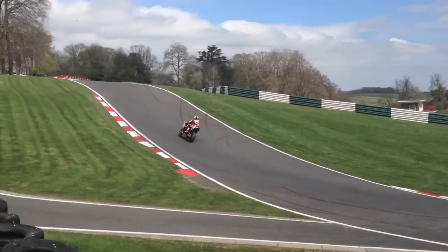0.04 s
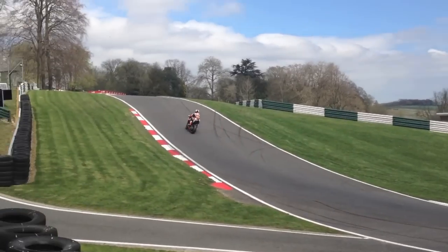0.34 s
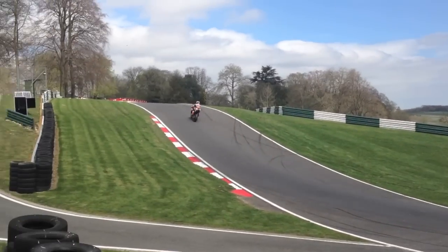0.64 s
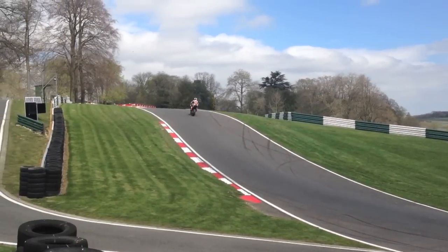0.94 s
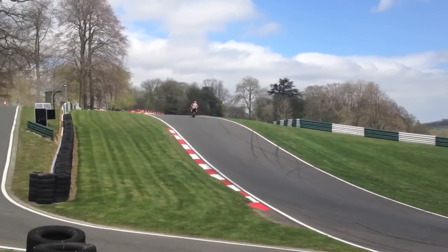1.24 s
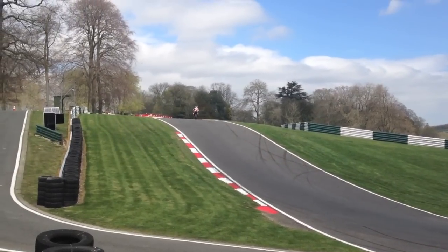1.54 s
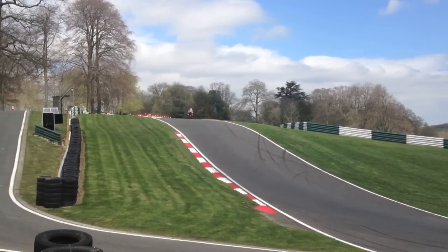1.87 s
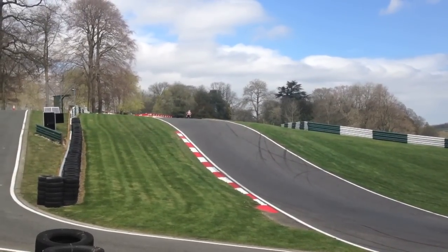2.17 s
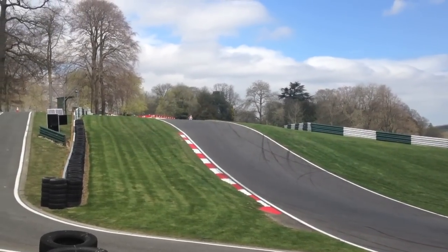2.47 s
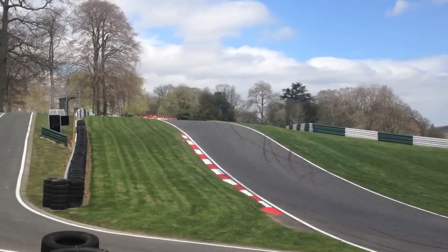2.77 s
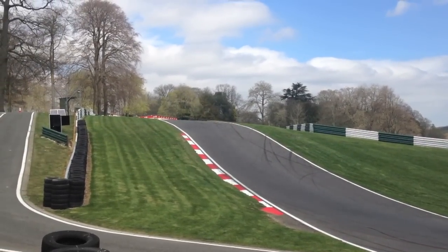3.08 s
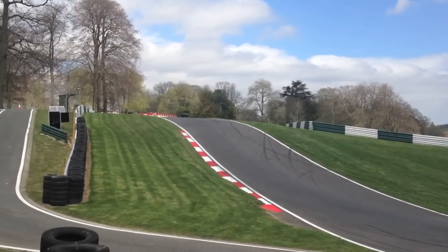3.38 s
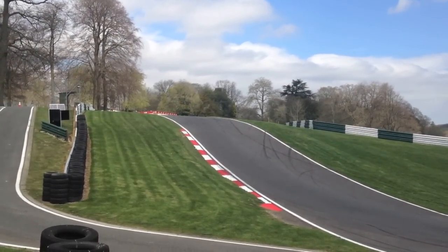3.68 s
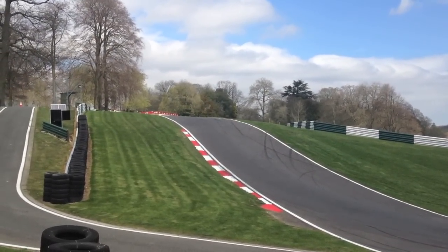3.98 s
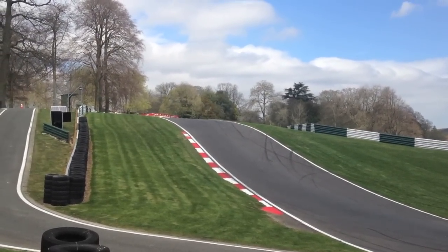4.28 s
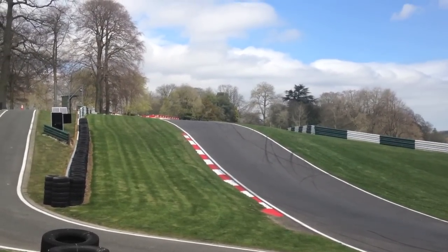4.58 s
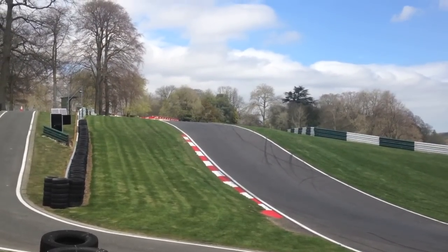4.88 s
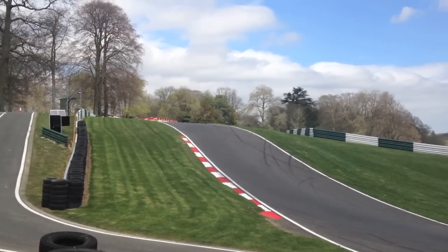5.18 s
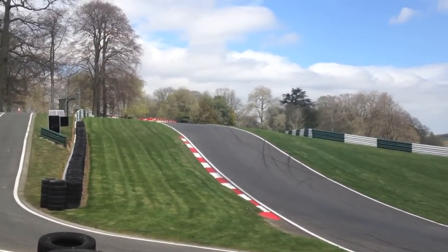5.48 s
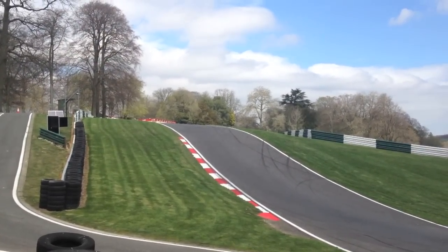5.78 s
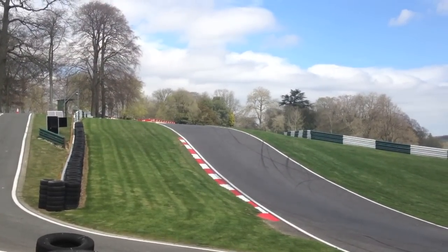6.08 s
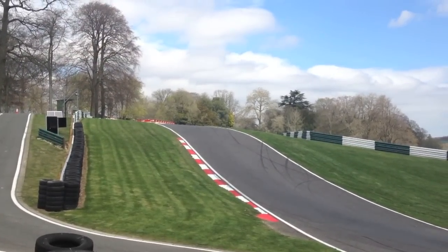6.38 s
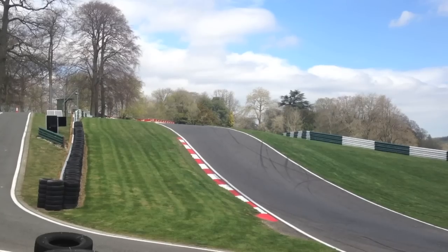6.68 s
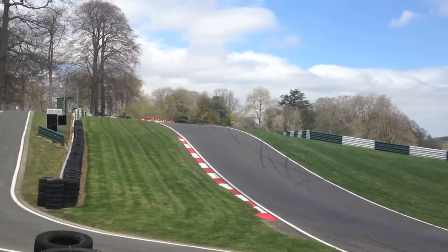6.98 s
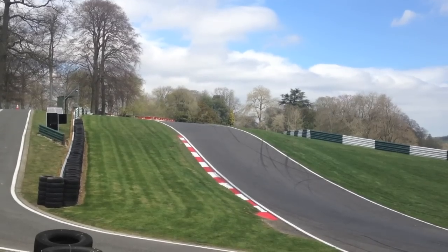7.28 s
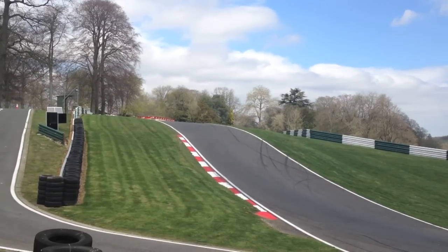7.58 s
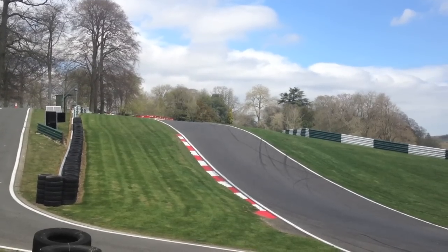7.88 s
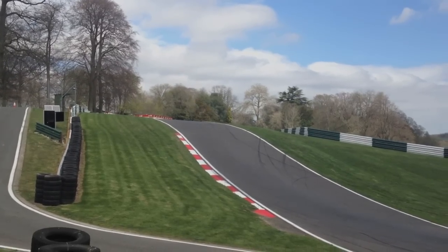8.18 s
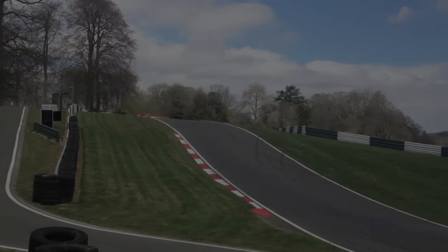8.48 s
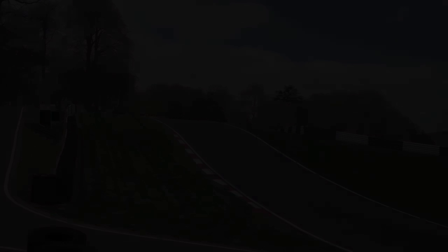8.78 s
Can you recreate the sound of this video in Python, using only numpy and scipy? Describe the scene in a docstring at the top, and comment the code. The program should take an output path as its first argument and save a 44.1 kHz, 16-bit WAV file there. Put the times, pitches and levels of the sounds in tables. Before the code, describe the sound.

Heard from the trackside in open air, a racing motorbike accelerates away with a growling, rasping engine. A brief bright surge of throttle leads into a steadily climbing, more distant roar. Then the throttle closes suddenly and a string of exhaust crackles and bangs follows, echoing lightly over a quieter, falling engine note that dies away behind a hill.

```python
"""Racing motorcycle over a crest

A bike with four unevenly firing cylinders climbs away, with a burst of throttle near the top.
Each firing rings the exhaust pipe. Out of sight it revs on, then the throttle shuts: the note sinks
and unburnt fuel crackles and bangs in the exhaust. Trees and barriers scatter the sound
into a roar that dies away."""
import sys
import numpy as np
from scipy import signal
from scipy.fft import rfft, next_fast_len
from scipy.io import wavfile
from scipy.ndimage import uniform_filter1d

SR = 44100
rng = np.random.default_rng(int(sys.argv[2]) if len(sys.argv) > 2 else 0)


def wav_record(signal):
    """Record a signal, one row per channel, as 16-bit PCM in the file named by sys.argv[1]."""
    frames = np.transpose(np.atleast_2d(signal))
    bounded = np.clip(frames, -1, 1)
    # unit amplitude maps onto the largest positive 16-bit level
    quanta = np.round(bounded * 32767).astype(np.int16)
    wavfile.write(sys.argv[1], SR, quanta)


N = 398652

# echoes from barriers and trees: (delay [s], level [dB])
TREE_ECHOES = [(0.013, -18), (0.025, -18.5), (0.073, -18.5), (.095, -16), (0.22, -17.5)]
# tone colour of the scattered roar and of its hiss: (pitch [Hz], relative level [dB])
ROAR_COLOUR = [(26, -65.5), (45, -59.5), (128, -16), (218, -14), (265, -10.5), (401, -15), (442, -16.5),
               (499, -9.5), (702, -13.5), (1450, -15.5), (1640, -10.5), (2670, -14), (5150, -37)]
HISS_COLOUR = [(3000, 11.5), (4500, 4), (5500, -1.5), (7000, -7), (8500, -24.5), (10000, -44.5),
               (15000, -47)]
# the treble once the throttle is shut: (time [s], relative level [dB])
COAST_TREBLE = [(4.1, -39), (4.64, -38), (5.22, -45.5), (5.64, -44), (5.8, -41), (5.96, -44), (6.45, -46.5),
                (6.91, -44.5), (7.19, -41.5), (7.94, -51), (8.1, -55.5)]
# how much of the rasp comes straight to the listener: (time [s], share of power [0-1])
DIRECT_SHARE = [(0, .87), (1.75, .91), (1.95, .95), (2.25, .9), (2.52, .05)]
# how late the bounce off the track arrives: (time [s], delay [s])
BOUNCE_DELAY = [(0, 0.0015), (.4, 0.0023), (.9, 0.0017), (1.6, 0.00182), (2.3, 0.0017)]
# brief boosts and dips in single bands that shift the engine's tone colour:
# (time [s], half length [s], pitch [Hz], width [Hz], gain [dB])
COLOUR_SWELLS = [(.03, .22, 1025, 350, -4), (0.099, 0.16, 510, 159.6, -1), (0.152, 0.083, 676, 129, -5.5),
                 (0.148, 0.19, 1520, 260, 7), (0.347, .1, 1390, 160, 6), (0.426, 0.059, 1080, 140, 7),
                 (0.59, 0.4, 2400, 380, 6.5), (0.658, 0.35, 1540, 400, -7.5), (0.927, 0.18, 650, 200, -9),
                 (0.966, 0.24, 1170, 200, 5.5), (1.056, 0.21, 541.6, 111, 5.5),
                 (0.87, 0.13, 1770, 250, 7.5), (1.17, 0.062, 880, 220, -25), (1.258, 0.059, 2400, 397, 7),
                 (1.372, 0.091, 1620, 400, -10.5), (1.536, 0.13, 1030, 204, -1.5),
                 (1.59, 0.28, 2470, 302, 7), (1.62, 0.39, 1750, 250, 4.5), (1.895, 0.26, 886, 145.5, 6),
                 (2.074, 0.2, 101, 91, -14.5), (2.267, 0.23, 2360, 230, 9), (2.733, 0.31, 158, 40.8, 4),
                 (2.699, 0.45, 477, 59.2, -7.5), (3.12, 0.08, 660, 130, 3), (3.796, 0.24, 564, 71, -12),
                 (3.76, 0.32, 740, 160, 7), (8.095, 0.33, 218, 59, -12)]
# gear tones: (pitch [multiple of the cycle rate], relative level [dB])
GEAR_TONES = [(39.4, -13), (62.6, -11.5), (70.1, -10.5), (78, -14), (86, -15)]
# exhaust bangs and crackles, with a few echoes of the loud bangs:
# (time [s], relative level [dB], thump offset [dB], crack offset [dB], bang pitch [Hz])
EXHAUST_BANGS = [(4.112, -14, -8.5, -20, 680), (4.166, -14.5, -10.5, -20.5, 660),
                 (4.175, -24, -5.5, -20, 970), (4.215, -16.5, -18, -13.5, 805), (4.231, -26, -1, -12, 894),
                 (4.267, -35, 1, -14, 800), (4.281, -16, -8, -13, 670), (4.295, -20, -10, -18, 748.5),
                 (4.349, -15, -15, -19, 754), (4.414, -9, -24, -22, 680), (4.424, -18.5, -20, -16, 1790),
                 (4.478, -9, -14, -24.5, 680), (4.545, -13.5, -15, -20, 686), (4.575, -18, -24, -18, 1800),
                 (4.624, -14, -14, -15.5, 1970), (4.697, -10.5, -14, -22, 853),
                 (4.801, -18.5, -11, -28, 720), (4.935, -16, -12.5, -24, 685),
                 (5.052, -25.5, -6.5, -22, 699), (5.167, -26.5, -3.5, -35, 698.6),
                 (5.267, -22, -5.5, -31.5, 730), (5.369, -7.5, -13, -20, 990),
                 (5.386, -17.5, -13.5, -30, 740), (5.481, -34, 5.5, -40, 737),
                 (5.601, -4.5, -19.5, -20.5, 812), (5.627, -15.5, -13, -27, 1400),
                 (5.67, -20, -10.5, -21, 706), (5.724, -19.5, -5, -39, 740), (5.752, -28, 0.5, -38, 716),
                 (5.857, -8.5, -14, -37, 1000), (5.871, -12, -15, -30, 1050),
                 (5.915, -13, -15.5, -24.5, 880), (6.001, -8, -11.5, -25, 937),
                 (6.023, -19.5, -11.5, -27, 790), (6.123, -23.5, 0.5, -43, 950),
                 (6.135, -19.5, -9.5, -36, 700), (6.153, -21.5, -7.5, -38, 902),
                 (6.26, -18, -8.5, -34, 705), (6.269, -21, -3, -32, 719), (6.276, -23, -12, -36, 705),
                 (6.424, -8.5, -8, -23, 1040), (6.532, -15, -11.5, -42, 691),
                 (6.548, -25.5, -5.5, -32, 720), (6.776, -8, -13, -26, 1032), (6.793, -26.5, -7, -25, 950),
                 (7.027, -2, -18.5, -18.5, 1100), (7.097, -16, -18, -22, 1001),
                 (7.122, -14.5, -20, -24, 1360), (7.246, -18, -34, -38, 950)]
# low ringing of the pipe after a bang: (pitch [Hz], width [Hz], level [dB])
THUMP_RINGS = [(288, 97, 14), (354, 380, 3)]
# ringing of its shock wave: (pitch [multiple of the bang pitch], width [Hz], level [dB])
BANG_RINGS = [(.68, 300, 3.5), (1.001, 258, 5.5), (1.8, 812, -5)]
# engine speed under power, two crank turns to a cycle: (time [s], cycle rate [Hz])
ENGINE_SPEED = [(0.0, 60.3), (0.14, 59.5), (0.37, 59.8), (0.72, 60.7), (0.9, 61.8), (1.0, 61.8),
                (1.19, 64.6), (1.25, 63.8), (1.32, 64.9), (1.41, 63.4), (1.79, 65), (2.08, 71.7),
                (2.18, 74.3), (2.28, 77.7), (2.46, 76), (2.94, 80.4), (3.45, 91), (3.92, 97.5), (4.0, 98.5)]
# the four cylinders: (place in the cycle [0-1], pressure [dB], sharp edge with the bike leaning [dB],
# sharp edge with it upright [dB])
CYLINDERS = [(0, 4.5, -13, -4), (0.099, 6, 5, 10), (0.331, 4, -2.5, 7), (0.739, -5, -2.5, -0.5)]
# ringing of the exhaust pipe and of the silencer: (pitch [Hz], width [Hz], level [dB])
PIPE_RINGS = [(148.2, 70, -1.5), (324.2, 50, 6), (394.6, 14, 8.5), (474.4, 124, 5), (669.5, 124, 3),
              (780, 91, -5)]
SILENCER_RINGS = [(998, 150, 4), (1561, 119, 4.5), (1593, 136, 3.5), (2350, 230, -12), (3100, 290, -24.5),
                  (3780, 95, -3), (4200, 1900, -10)]
# pulling away; rows are boom, bark, rasp, hiss, rumble: (relative level at the start [dB], loss [dB/s])
DISTANCE_FADES = [(-13.5, 7), (-14.5, 8), (-30, 4.5), (-31.5, 6.5), (-29, 3.5)]
# twists of the throttle: (peak time [s], rise [s], fall [s], boom [dB], bark [dB], rasp [dB], hiss [dB])
THROTTLE_TWISTS = [(0.39, 0.26, 2.75, -1.5, -3, 3, 1), (2.03, 0.21, 0.43, 11, 5, 15.5, 8),
                   (2.01, 0.077, 0.1, -3, 1, -4, 7), (3.3, 0.4, 0.26, 0, 1, 0.5, 2.5),
                   (3.69, 0.92, 3.1, 12, 2, 9, 10.5)]
# throttle shut; rows are boom, bark, rumble: (level as it shuts [dB], loss [dB/s])
COAST_FADES = [(-32, 5), (-43.5, 4), (-35.5, 2.5)]
# air intake, tailpipe, deep bass and silencer can: (pitch [Hz], width [Hz], level [dB])
AIRBOX, TAILPIPE, BASS, CAN = (475, 200, 0), (275, 38, 0), (110, 31, 0), (1200, 36, -3.5)

BOOM_TOP_HZ, BARK_TOP_HZ, RASP_TOP_HZ, HISS_TOP_HZ = 430, 850, 3000, 7000   # four bands, low to high
TURN_S, TURN_TAKES_S = 0.86, 0.46   # the bike straightens up and points its pipe at the listener
SHUT_S, SHUT_TAKES_S = 4.02, 0.078   # the throttle closes
HILL_S, HILL_TAKES_S = 6.3, 2.1   # the bike drops far behind the hill


def from_db(db):
    """Turns decibels into a gain."""
    return 10 ** (np.asarray(db) / 20)


def rms_one(x):
    """Scales a sound so that its average level (rms) is 1."""
    return x / np.sqrt(np.mean(x ** 2) + 1e-20)


def evened(x, size=4000):
    """Holds the level at 1 from moment to moment."""
    return x / np.sqrt(np.abs(uniform_filter1d(x * x, size)) + 1e-14)


def curve(rows):
    """Joins (time, value) points with straight lines."""
    times, values = np.transpose(rows)
    return np.interp(np.arange(N) / SR, times, values)


def ramp(start_s, takes_s):
    """Goes from 0 to 1 in a straight line, then holds."""
    return np.clip((np.arange(N) / SR - start_s) / takes_s, 0, 1)


def bell(centre_s, half_s):
    """Rises smoothly to 1 and falls again."""
    return np.exp(-((np.arange(N) / SR - centre_s) / half_s) ** 2)


def blend(a, b, share):
    """Gives a at share 0 and b at share 1."""
    return a + (b - a) * share


def drift(rate_hz):
    """A smooth random wobble, about 1 in size."""
    r = np.exp(-80 * np.pi * rate_hz / SR)
    slow = signal.lfilter([1], [1, -2 * r, r * r], rng.standard_normal(N // 40 + 2002))[2000:]
    return np.interp(np.arange(N) / 40, np.arange(len(slow)), rms_one(slow))


def noise(colour):
    """Noise with the given tone colour."""
    hz, db = np.transpose(colour)
    size = next_fast_len(N)
    grid_hz = np.maximum(np.fft.rfftfreq(size, 1 / SR), 1)
    gains = from_db(np.interp(np.log(grid_hz), np.log(hz), db))
    return np.fft.irfft(rfft(rng.standard_normal(size)) * gains, size)[:N]


def only(x, hz, kind, order=4):
    """Lets only the lows, the highs or a band through; a higher order cuts more sharply."""
    return signal.sosfilt(signal.butter(order, hz, kind, fs=SR, output="sos"), x + 1e-18)


def resonate(x, rings):
    """Makes x ring at each listed pitch and adds the rings up, every second one flipped."""
    out = 0
    for k, (hz, width, db) in enumerate(rings):
        r = np.exp(-np.pi * width / SR)
        poles = [1, -2 * r * np.cos(2 * np.pi * hz / SR), r * r]
        ring = (1 - r * r) / 2 * signal.lfilter([1, 0, -1], poles, x + 1e-18)
        out = out + (-1) ** k * from_db(db) * ring
    return out


def delayed(x, delay_s):
    """Plays a sound late by a delay that can change."""
    return np.interp(np.arange(N) - delay_s * SR, np.arange(N), x)


def open_air(hiss_db=-76, rumble_above_db=12.5):
    """Faint hiss over a low outdoor rumble."""
    rumble = rms_one(only(rng.standard_normal(N), [60, 170], "band", order=2))
    return from_db(hiss_db) * (rng.standard_normal(N) + from_db(rumble_above_db) * rumble)


def tree_echoes(x, tail_db=-10.0, tail_s=0.82, build_s=0.0049):
    """A few clear echoes and a dull tail from the trees, which throw back little bass."""
    t = np.arange(SR) / SR
    tail = rng.standard_normal(SR) * from_db(1.5 * rng.standard_normal(SR) - 60 * t / tail_s)
    tail *= 1 - np.exp(-t / build_s)
    response = from_db(tail_db) * tail / np.linalg.norm(tail)
    for delay_s, db in TREE_ECHOES:
        response[int(delay_s * SR)] += from_db(db)
    echoes = signal.fftconvolve(only(x, 600, "high", order=1), response)[:N]
    return only(echoes, 7000, "low", order=2)


def scattered_roar(rumble_db, rasp_db, hiss_db, direct, flicker_db=1.55, fizz_db=-10.5):
    """Exhaust noise scattered by the trees; moving air makes each band flicker."""
    scattered_db = 10 * np.log10(1 - direct)   # the share that does not come straight
    far_hiss_db = hiss_db + scattered_db
    top_db = hiss_db + blend(-14.5, -24.5, ramp(0, 2.8))   # air soaks up the top octave with distance
    low, high = noise(ROAR_COLOUR), noise(HISS_COLOUR)
    bands = [(only(low, BARK_TOP_HZ, "low"), rumble_db),
             (only(low, [BARK_TOP_HZ, RASP_TOP_HZ], "band", order=6), rasp_db + scattered_db),
             (only(high, [RASP_TOP_HZ, HISS_TOP_HZ], "band", order=6), far_hiss_db),
             (only(high, HISS_TOP_HZ, "high", order=6), far_hiss_db + fizz_db),
             (only(rng.standard_normal(N), [HISS_TOP_HZ, 10500], "band", order=1), top_db)]
    return sum(rms_one(band) * from_db(db + flicker_db * drift(5.5)) for band, db in bands)


def track_bounce(x, direct, bounce_db=-8):
    """While the bike is in sight, a late copy off the asphalt lifts some pitches and thins others."""
    late = delayed(x, curve(BOUNCE_DELAY))
    gain = from_db(bounce_db) * direct
    return (x + gain * late) / np.sqrt(1 + gain ** 2)


def colour_swells(x):
    """Brief boosts and dips in single bands shift the engine's tone colour."""
    for s, half_s, hz, width, db in COLOUR_SWELLS:
        x = x + (from_db(db * bell(s, half_s)) - 1) * resonate(x, [(hz, width, 0)])
    return x


def gear_whine(cycles, hiss_db, lift_db=5):
    """Gear teeth sing high above the engine note, blurred by their slack and soon lost with distance."""
    whine = 0
    for multiple, db in GEAR_TONES:
        phase = 2 * np.pi * multiple * cycles
        blurred = drift(60) * np.cos(phase) + drift(60) * np.sin(phase)
        whine = whine + from_db(db + drift(1.6)) * blurred
    distance_db = -24 * ramp(.3, .9)
    return from_db(hiss_db + lift_db + distance_db) * whine


def bang_rings(bang_hz):
    """The pitches a shock wave sets ringing: its own and the silencer can's."""
    return [(ratio * bang_hz, width, db) for ratio, width, db in BANG_RINGS] + [CAN]


def sputter(rasp_db, pops_per_s=35.2, spread_db=9, bang_hz=1100):
    """Off the throttle, stray drops of fuel light at random and ring the pipe until the hill hides it."""
    sizes = from_db(spread_db * np.minimum(rng.standard_normal(N), 2))
    sparks = sizes * (rng.random(N) < pops_per_s / SR)
    rings = resonate(sparks, THUMP_RINGS + bang_rings(bang_hz))
    crackle = rms_one(only(rings, RASP_TOP_HZ, "low", order=2))
    heard = ramp(SHUT_S, SHUT_TAKES_S) - ramp(HILL_S, HILL_TAKES_S)
    return heard * from_db(rasp_db - 1.5) * crackle


def exhaust_bangs(swell_s=0.0024, shock_s=.0042, spit_s=0.0077, bounce_db=-2, size=4096):
    """Bangs, crackles and a few echoes: each a thump, a shock hollowed by its bounce, a spit of gas."""
    out, t = np.zeros(N + size), np.arange(size) / SR
    swell = signal.unit_impulse(size, int(swell_s * SR))
    shock = signal.unit_impulse(size, int(shock_s * SR))
    gas_push = 0.04 * only(swell, 180, "low", order=2)
    thump = only(resonate(-swell, THUMP_RINGS) - gas_push, 454, "low", order=2)
    spit_fade = (t > shock_s) * np.exp(-np.abs(t - shock_s) / spit_s)
    for s, db, thump_db, crack_db, bang_hz in EXHAUST_BANGS:
        bounce = signal.unit_impulse(size, int((shock_s + 1 / bang_hz) * SR))
        blast = shock + from_db(bounce_db) * bounce
        gas = .17 * rng.standard_normal(size) * spit_fade
        bang = only(resonate(-blast - .6 * gas, bang_rings(bang_hz)), 3400, "low", order=2)
        crack = only(blast + gas, 2200, "high", order=2)
        crack = only(crack, 7000, "low", order=3)
        crack = only(crack, 1700, "low", order=1)
        start = round(s * SR)
        for part, part_db in [(thump, thump_db + 7.5), (bang, -5.5), (crack, crack_db + 5.5)]:
            out[start:start + size] += from_db(db + part_db) * part / np.abs(part).max()
    return out[:N]


def on_throttle(turn_bark_db=8.5):
    """Cycle rate, then boom, bark, rasp, hiss and rumble in dB: distance lowers them, twists shape them."""
    levels = np.array([db - loss * np.arange(N) / SR for db, loss in DISTANCE_FADES])
    for s, rise_s, fall_s, *lift_db in THROTTLE_TWISTS:
        twist = ramp(s - rise_s, rise_s) - ramp(s, fall_s)
        levels[:-1] += np.outer(lift_db, twist)   # all but the rumble
    levels[1] += turn_bark_db * ramp(TURN_S, TURN_TAKES_S)
    return np.vstack([curve(ENGINE_SPEED), levels])


def off_throttle(start_hz=96.5, sag_hz_per_s=8.3):
    """The same six curves with the throttle shut: the engine brakes the bike and the sound dies away."""
    since_s = np.maximum(np.arange(N) / SR - SHUT_S, 0)
    cycle_hz = start_hz - sag_hz_per_s * since_s
    boom_db, bark_db, rumble_db = [db - loss * since_s for db, loss in COAST_FADES]
    treble_db = curve(COAST_TREBLE)
    return np.array([cycle_hz, boom_db, bark_db, treble_db - 3, treble_db - 11.5, rumble_db])


def firings(cycles, rough_db, jitter_s, column):
    """One pulse per firing, each a little different; column picks its level from CYLINDERS."""
    pulses, whole_cycles = np.zeros(N), np.arange(int(cycles[-1]))
    for cylinder in CYLINDERS:
        time_chance, level_chance = rng.standard_normal((1000, 2))[:len(whole_cycles)].T
        on_time = np.interp(whole_cycles + cylinder[0], cycles, np.arange(N))
        at = np.clip(on_time + jitter_s * SR * time_chance, 0, N - 2)
        strength = from_db(cylinder[column] + rough_db * level_chance)
        np.add.at(pulses, at.astype(int), strength * (1 - at % 1))   # shared between two samples
        np.add.at(pulses, at.astype(int) + 1, strength * (at % 1))
    return pulses


def exhaust_rasp(cycles, rasp_db, hiss_db, puff_s=0.0015, turbulence=0.94):
    """Each firing's sharp edge rings the silencer over a hissing jet of gas."""
    leaning, upright = [firings(cycles, rough_db=.8, jitter_s=.00001, column=k) for k in (2, 3)]
    edges = rms_one(blend(leaning, upright, ramp(TURN_S, TURN_TAKES_S)))
    puff_shapes = signal.lfilter([1], [1, -np.exp(-1 / (puff_s * SR))], edges)
    puffs = rms_one(puff_shapes * rng.standard_normal(N))
    # on full throttle the jet pulses harder, and shock waves go straight through the silencer
    full_throttle = bell(1.986, 0.093)
    pulsed_share = blend(.25, .9, full_throttle)
    shock_gain = from_db(blend(-28, -3.5, full_throttle))
    steady_jet = np.sqrt(1 - pulsed_share) * rng.standard_normal(N)
    jet = np.sqrt(pulsed_share) * rms_one(edges + turbulence * puffs) + steady_jet
    clean, rough = [resonate(gas, SILENCER_RINGS) + shock_gain * only(gas, 2510, "low", order=1)
                    for gas in (edges + .1 * puffs, jet)]
    rasp = evened(only(clean, [BARK_TOP_HZ, RASP_TOP_HZ], "band"))
    hiss = evened(only(rough, [RASP_TOP_HZ, HISS_TOP_HZ], "band"))
    flutter_db = .8 * drift(8)
    return from_db(rasp_db + flutter_db) * rasp + from_db(hiss_db - 5.0) * hiss


def growl_and_drone(pipe):
    """The intake growls close by, the tailpipe drones once it turns toward the listener past the crest, then
    bass bends over the hill."""
    nearness = np.exp(-np.arange(N) / SR)
    pipe_facing = ramp(2.76, 0.4)
    behind_hill = ramp(HILL_S, HILL_TAKES_S)
    for ring, db in [(AIRBOX, blend(-16.5, 5, nearness)),
                     (TAILPIPE, blend(-25.5, 5.5, pipe_facing - behind_hill)),
                     (BASS, blend(-16.5, 26, behind_hill))]:
        pipe = pipe + from_db(db) * resonate(pipe, [ring])
    return pipe


def exhaust_note(cycles, boom_db, bark_db, direct, wander_s=.00026, waver_db=1.5):
    """Firings ring the pipe with a low boom and a bark; out of sight, wandering paths roughen the note."""
    pressure = firings(cycles, rough_db=.35, jitter_s=.000015, column=1)
    pipe = growl_and_drone(resonate(pressure, PIPE_RINGS))
    boom = evened(only(pipe, BOOM_TOP_HZ, "low", order=8))
    bark = evened(only(pipe, [BOOM_TOP_HZ, BARK_TOP_HZ], "band", order=6))
    path_delay_s = wander_s * ramp(3.0, .8) * drift(35)
    note = from_db(boom_db) * boom + from_db(bark_db) * delayed(bark, path_delay_s)
    return from_db(waver_db * (1 - direct) * drift(23)) * note


def scene():
    """The engine, heard straight and scattered, plus the exhaust bangs, their echoes and the open air."""
    shut = ramp(SHUT_S, SHUT_TAKES_S)
    cycle_hz, boom_db, bark_db, rasp_db, hiss_db, rumble_db = blend(on_throttle(), off_throttle(), shut)
    cycles = np.cumsum(cycle_hz) / SR   # engine cycles so far
    direct = curve(DIRECT_SHARE)
    note = exhaust_note(cycles, boom_db, bark_db, direct)
    near = np.sqrt(direct) * (exhaust_rasp(cycles, rasp_db, hiss_db) + gear_whine(cycles, hiss_db))
    far = scattered_roar(rumble_db, rasp_db, hiss_db, direct)
    engine = colour_swells(note + track_bounce(near, direct) + far)
    engine = only(engine, 102, "high", order=2)   # distance thins the bass
    pops = exhaust_bangs() + sputter(rasp_db)
    return (engine + pops + tree_echoes(pops) + open_air())[None]


def record(dry, fade_s=7.96, silent_s=8.936, top_hz=15200):
    """The microphone loses the deepest bass; the end fades out and the highest treble is cut."""
    faded = only(dry, 56, "high", order=2) * (1 - ramp(fade_s, silent_s - fade_s))
    return signal.sosfilt(signal.ellip(10, .1, 90, top_hz, fs=SR, output="sos"), faded)


dry = scene()
out = record(dry)
wav_record(out)
```